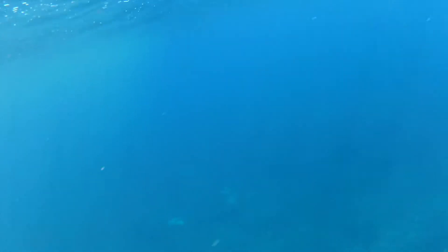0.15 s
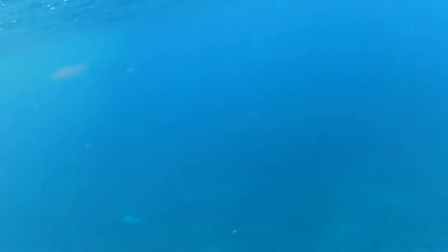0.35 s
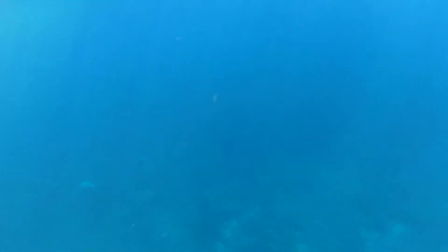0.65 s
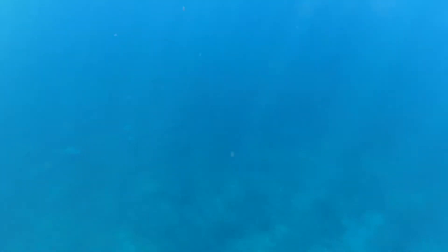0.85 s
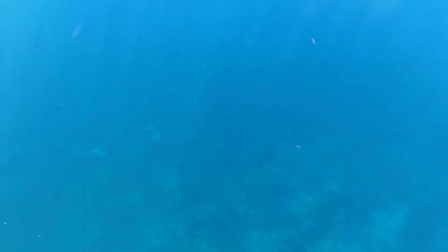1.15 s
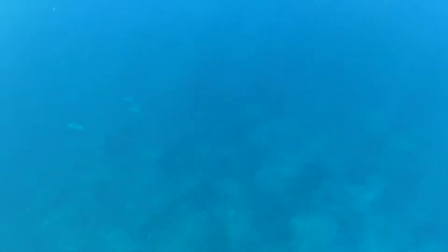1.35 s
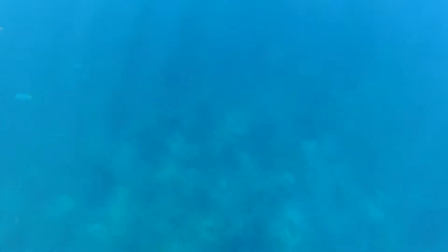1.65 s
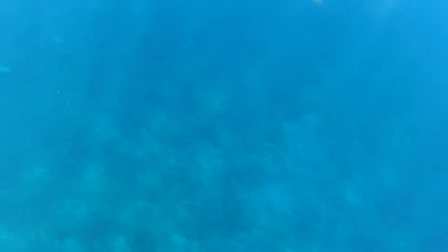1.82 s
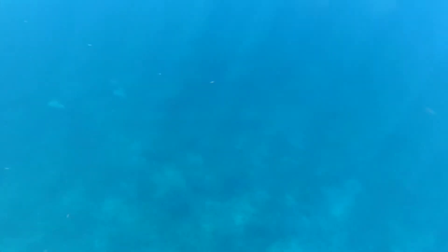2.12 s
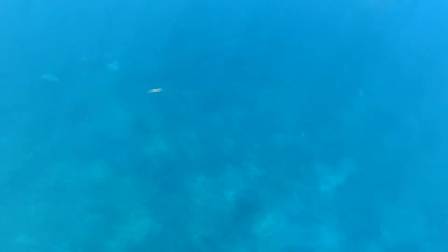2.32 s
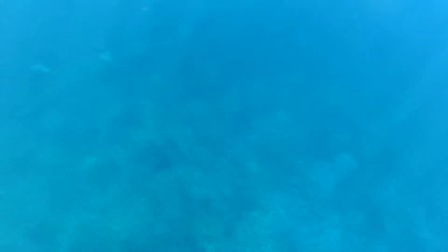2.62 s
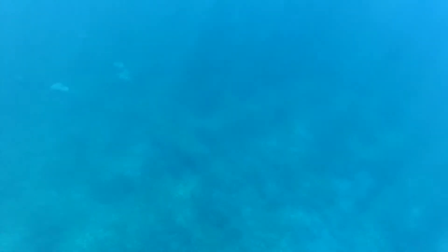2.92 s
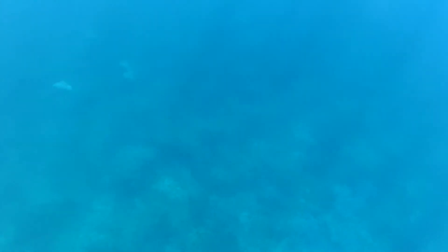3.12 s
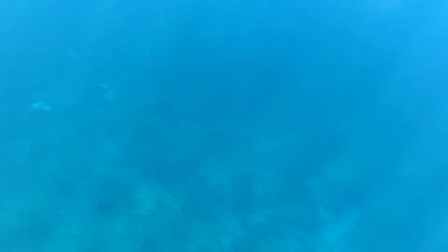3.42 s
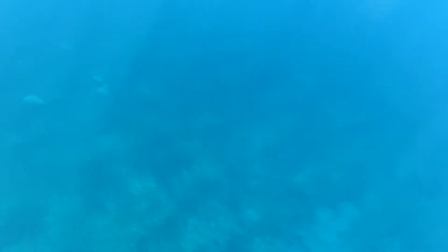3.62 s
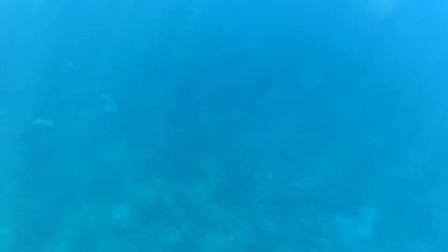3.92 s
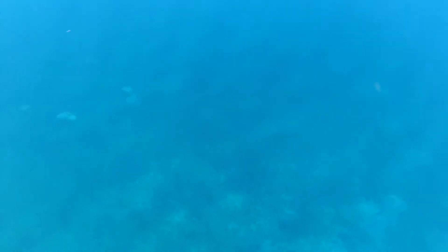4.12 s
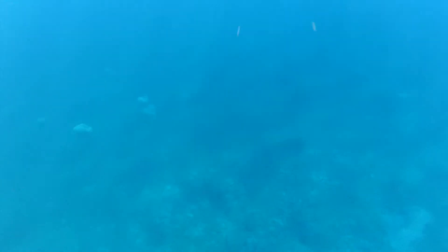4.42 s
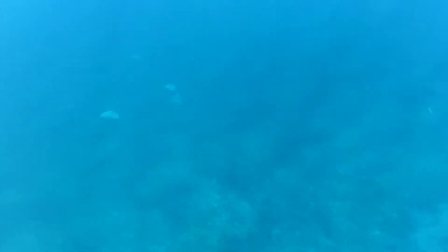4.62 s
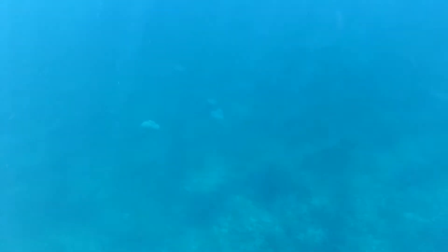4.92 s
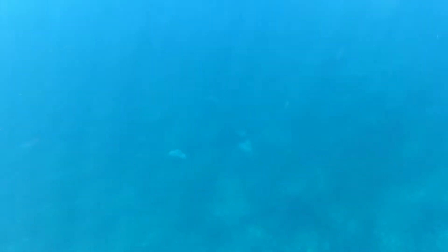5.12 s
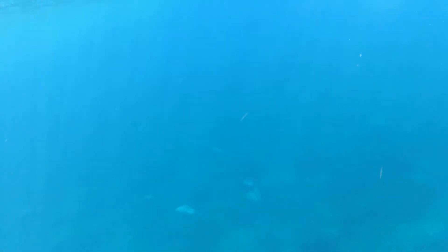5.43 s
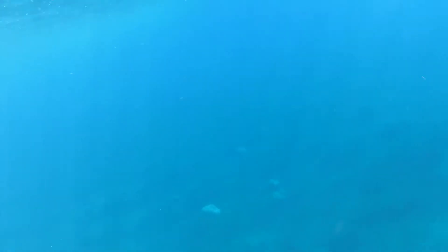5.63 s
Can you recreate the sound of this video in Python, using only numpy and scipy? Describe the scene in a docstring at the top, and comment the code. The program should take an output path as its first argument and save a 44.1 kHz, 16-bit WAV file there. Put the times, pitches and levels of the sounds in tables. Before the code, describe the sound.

Underwater, faint lapping and tiny snaps, then hard knocks on a camera housing before a boat engine catches and settles into a bubbling, hissing idle.

```python
"""Under water beside a boat, inside a camera housing. Small resonant bubbles lap at the surface, snaps sound,
and rubs and hard knocks excite the damped modes of the housing. Then the engine starts and settles to an idle.
Each early firing puffs exhaust into a gas pocket whose ring sinks as it grows; a harmonic throb follows.
Clouds of bubbles, made of filtered random clicks, gurgle in step; finer clicks through the housing's resonances
make the churned water hiss, and single large bubbles ring with rising pitch."""
import sys
import numpy as np
from scipy import signal
from scipy.fft import rfft, irfft
from scipy.io import wavfile

SR = 44100
rng = np.random.default_rng(int(sys.argv[2]) if len(sys.argv) > 2 else 0)


def to_wav(s):
    """Save 16-bit WAV."""
    ch = np.atleast_2d(s).T  # columns
    pcm = np.round(np.clip(ch, -1, 1) * 32767)  # PCM
    wavfile.write(sys.argv[1], SR, pcm.astype(np.int16))


N = 254016
TIME = np.arange(N) / SR
BUBBLE_TIME = np.arange(-SR // 30, SR // 20) / SR

# All spectra below are relative: [f/Hz, level/dB]
# Wash of still water; bubbles of the lapping: [f/Hz, level/dB]
STILL_WATER_SPECTRUM = [(25, -4), (55, -11), (85, -6.5), (140, -14.5), (210, -7), (420, -7), (700, -16),
                        (1100, -10.5), (1650, -19), (2100, -14.5), (2500, -19.5), (3000, -32), (9000, -52),
                        (15000, -35)]
LAP_SPECTRUM = [(120, -8), (270, -6.5), (450, 0), (560, -11.5), (660, -6), (850, -21.5), (1400, -8.5),
                (2500, -29)]
# Snaps in the water: [t/s, level/dB before the band-pass]
SNAPS = [(.078, -27.5), (.229, -34), (.283, -42), (.881, -28.5), (.991, -39)]
# Rubbing on the housing: [start t/s, length/s, rustle level/dB, scratch level/dB]
RUBS = [(0.949, 0.045, -43, -72), (1.081, 0.042, -40.5, -72), (1.138, 0.021, -33, -73),
        (1.163, 0.07, -27, -45.5), (1.245, 0.036, -42, -64), (1.357, 0.022, -27, -53),
        (1.386, 0.024, -40.5, -42.5), (1.435, 0.047, -33.5, -53)]
# Dull and scratchy parts of the rubbing: [f/Hz, level/dB]
RUSTLE_SPECTRUM = [(90, -18), (200, -3), (450, 1.5), (800, -1), (1050, 2), (1370, 6), (1700, -12),
                   (2500, -15), (3500, -44)]
SCRATCH_SPECTRUM = [(2500, -4), (3800, -5), (5200, 1), (7200, -7), (8500, 6), (10000, -12), (15000, -17)]
# Knocks on the housing: [t/s, level/dB added to the modes, ring f/Hz, contact cut-off f/Hz]
KNOCKS = [(1.1146, -21, 1260, 1700), (1.1378, -22.5, 1370, 2190), (1.163, 19, 1355, 7500),
          (1.1693, -4, 1480, 2320), (1.2149, -18.5, 1390, 2100), (1.231, -20, 1370, 2000),
          (1.3546, -1.5, 1045, 4100), (1.356, 3, 1350, 2900), (1.4203, 2, 1323, 3580),
          (1.4548, -24, 1250, 2200), (1.6485, -6, 1316, 2440)]
# Modes of the housing: [multiple of the ring f, mean level/dB, t60/s]
HOUSING_MODES = [(.33, -16.5, 0.0203), (.6, -9, 0.016), (.8, -8.5, 0.018), (0.998, 4, 0.015),
                 (1.24, -20, 0.026), (1.55, -12.5, 0.0071), (1.8, -10, .009), (3.8, -3, 0.0041)]
# Treble resonances of the housing: [f/Hz, half the bandwidth of each of two filters/Hz, level/dB]
LOWER_MODES = [(2500, 140, -1), (3015, 143, 0), (3324, 190, -2.5), (4584, 430, -3.5), (5138, 290, 6),
               (5160, 410, -11), (6054, 270, 1.5), (6616, 200, -1)]
UPPER_MODES = [(7720, 300, 4), (8400, 360, 3), (9160, 310, 2.5), (9850, 270, -2.5), (10260, 320, -2),
               (11000, 390, -9.5), (12230, 1400, -15), (13400, 700, -24), (14700, 700, -20)]
# Single large bubbles: [t/s at the loudest, level/dB, f/Hz at the loudest, swell/s]
LARGE_BUBBLES = [(.683, -31.5, 515, .006), (1.087, -21, 442, 0.0029), (1.195, -22.5, 560, 0.01),
                 (1.582, -10.5, 427, 0.0018), (1.946, -20, 613, .0017), (2.49, -10.5, 504.5, 0.0063),
                 (2.546, -6.5, 421, 0.008), (2.671, -5.5, 450, .003), (2.745, -9, 273, 0.011),
                 (2.755, -9, 599, 0.0066), (2.817, -6.5, 432, .004), (2.881, -9.5, 440, .012),
                 (3.315, -15.5, 606, 0.0035), (3.51, -14, 794, .0012), (3.558, -17, 679, 0.0041),
                 (3.657, -16.5, 657, 0.0047), (3.751, -14.5, 653, .006), (3.85, -15.5, 674, .004),
                 (4.301, -14, 710, 0.0029), (4.446, -18.5, 628, 0.006), (4.953, -7, 642, 0.0036),
                 (5.001, -10, 670, .0034), (5.051, -9.5, 648, .0044), (5.145, -16.5, 665, 0.0024),
                 (5.205, -20, 1050, 0.0021), (5.504, -18.5, 624, 0.0041)]
# Engine speed: [t/s, firing rate/Hz]
ENGINE_SPEED = [(1.72, 23.74), (1.9, 27.25), (2.05, 33.94), (2.2, 37.8), (2.4, 40.24), (2.7, 40.39),
                (3.1, 41.3), (3.5, 41.58), (3.8, 41.93), (4.3, 41.71), (4.8, 41.25), (5.1, 41.78),
                (5.76, 41.48)]
# Large, medium and small bubbles of the exhaust, and its low rumble: [f/Hz, level/dB]
LARGE_SPECTRUM = [(170, -8.5), (270, -5.5), (350, -3.5), (410, 0.5), (460, 2.5), (510, -6.5), (570, -14.5)]
MEDIUM_SPECTRUM = [(500, -18.5), (600, 3), (675, 1.5), (740, -4), (850, -2.5), (1000, -17.5), (1300, -17)]
SMALL_SPECTRUM = [(600, 3), (880, 0.5), (1080, 1.5), (1220, 2.5), (1380, 1.5), (1620, -6.5), (1850, -0.5),
                  (2000, -5), (2170, -2.5), (2320, -8.5), (2520, -0.5), (2800, -20), (3300, -9.5),
                  (3800, -50)]
RUMBLE_SPECTRUM = [(25, -30), (50, -9), (75, -2), (105, 2), (150, -6), (230, -13), (320, -18)]
# Burps of gas at the top of the surge: [middle t/s, length/s, level/dB]
BURPS = [(2.55, 0.056, -10), (2.679, 0.045, -13), (2.786, 0.21, -17)]
# Idle throb: [t/s, level/dB before trim and drift]
THROB_LEVEL = [(2.45, -20), (2.72, -17.5), (3.67, -19.5), (3.77, -21), (4.06, -16), (5.11, -18.5),
               (5.14, -20), (5.69, -18.5), (5.72, -21.5)]
# Harmonics of one pressure pulse: [multiple of the firing rate, relative level/dB]
THROB_ORDERS = [(2, 0.5), (3, -13.5), (4, -10), (5, -11.5), (6, -14), (7, -17), (8, -36), (9, -26.5),
                (10, -26), (11, -22.5), (12, -22)]
# Modes of the gas pocket:
# [multiple of its f, mean level/dB, t60/s, full strength t/s, rise/(dB/s), hold/s, fall/(dB/s)]
POCKET_MODES = [(0.653, -20.5, 0.13, 1.83, 200, .65, 80), (0.998, -12.5, 0.17, 2.01, 74, .42, 90),
                (1.194, -17, 0.14, 1.92, 280, .09, 67), (1.7, -23, .08, 2, 70, .15, 23)]

# Exhaust flow: it builds up to a surge, holds, settles to the idle and then fades slowly
SURGE_S, SURGE_RISE_DB_PER_S, SURGE_HOLD_S = 2.614, 23, 0.62
SETTLE_S, IDLE_DROP_DB, IDLE_FADE_DB_PER_S = 0.48, 6.5, .8
# A small bubble chirps sharply upwards as the pocket breaks
CHIRP_S, CHIRP_DB, CHIRP_HZ = 2.5185, -9, 1190
CHIRP_SWELL_S, CHIRP_DECAY_S, CHIRP_OCT_PER_S = 0.0024, 0.0047, 85
# The lower hiss swells once, briefly; later a narrow band sings out
HISS_SWELL_S, HISS_SWELL_LENGTH_S, HISS_SWELL_DB = 3.48, 0.13, 4.5
SING_S, SING_LENGTH_S, SING_DB = 4.7, 1, -44.5
SING_HZ, SING_FILTER_WIDTH_HZ = 7660, 560
# The ring has this pitch when the engine catches, and sinks as the pocket grows
CATCH_AT_S, RING_HZ, RING_SAG_HZ_PER_S = 1.9, 279.3, 234
CUTOFF_HZ = 15500


def from_db(db):
    """Level to amplitude: 20 dB is a factor of ten."""
    return 10 ** (np.asarray(db) / 20)


def rms_one(x):
    """Normalisation to unit root-mean-square amplitude."""
    return x / np.sqrt(np.mean(x ** 2) + 1e-20)


def in_time(rows):
    """Linear interpolation of a table's columns at every sample."""
    s, *columns = np.transpose(rows)
    return [np.interp(TIME, s, column) for column in columns]


def coloured(x, spectrum):
    """Spectral shaping: weights frequencies on a logarithmic axis, then sets rms 1."""
    hz, db = np.transpose(spectrum)
    bins = np.arange(1, N // 2 + 2) * SR / N
    gain_db = np.interp(np.log(bins), np.log(hz), db, left=-80, right=-80)
    return rms_one(irfft(rfft(x) * from_db(gain_db), N))


def drift(rate):
    """Slow random fluctuation: noise knots at this rate per second joined by lines; rms 1."""
    knots = rng.standard_normal(int(N / SR * rate) + 2)
    return rms_one(np.interp(TIME * rate, np.arange(len(knots)), knots))


def white_noise():
    """Noise with equal mean power at all frequencies."""
    return rng.standard_normal(N)


def resonance(x, hz, width_hz):
    """Damped resonance: a two-pole band-pass of about unit peak gain."""
    r = np.exp(-np.pi * width_hz / SR)
    feedback = [1, -2 * r * np.cos(2 * np.pi * hz / SR), r * r]
    return signal.lfilter(np.array([1, 0, -1]) * (1 - r * r) / 2, feedback, x)


def double_resonance(x, hz, width_hz):
    """Two equal resonances in series, giving steeper skirts."""
    return resonance(resonance(x, hz, width_hz), hz, width_hz)


def through_modes(x, modes):
    """Modal filtering: parallel resonances, fed at staggered delays; rms 1."""
    total = np.zeros(N)
    for k, (hz, width, db) in enumerate(modes):
        delayed = np.roll(x, k * SR // 7)
        total += from_db(db) * double_resonance(delayed, hz, 2 * width)
    return rms_one(total)


def grains(per_s, spread_db):
    """Shot noise: random clicks of uneven size and either sign; rms 1."""
    sizes = from_db(spread_db * np.minimum(rng.exponential(1, N), 4))
    signed = sizes * rng.choice([-1, 1], N)
    return rms_one(signed * (rng.random(N) < per_s / SR))


def add(out, sound, s):
    """Superposition: adds a sound in place, starting at time s."""
    i = max(int(s * SR), 0)
    out[i:i + len(sound)] += sound[:max(N - i, 0)]


def envelope(full_s, rise_db_per_s, hold_s, fall_db_per_s):
    """Exponential growth, hold and decay, in dB below the top."""
    rise = rise_db_per_s * np.maximum(full_s - TIME, 0)
    fall = fall_db_per_s * np.maximum(TIME - full_s - hold_s, 0)
    return -rise - fall


def bump(s, length):
    """Gaussian swell of height 1 about time s; its length lies between the 1/e points."""
    return np.exp(-(2 * (TIME - s) / length) ** 2)


def calm_water(floor_db=-51, lower_db=-58, upper_db=-63):
    """Broadband background: a soft wash, and a faint hiss filtered by the housing's modes."""
    wash = from_db(floor_db) * coloured(white_noise(), STILL_WATER_SPECTRUM)
    white = white_noise()
    lower = from_db(lower_db) * through_modes(white, LOWER_MODES)
    upper = from_db(upper_db) * through_modes(white, UPPER_MODES)
    return wash + lower + upper


def lapping(level_db=-44, waver_db=0.5, per_s=200, spread_db=1.5, cycles=7, count=14):
    """Bubble resonance: ripples fold in small bubbles that ring for a few cycles; the lapping builds and ebbs."""
    drops = sum(resonance(grains(per_s / count, spread_db), hz, hz / cycles)
                for hz in np.geomspace(280, 1100, count))
    swell_db = envelope(full_s=.62, rise_db_per_s=15, hold_s=0.5, fall_db_per_s=7)
    swell_db = swell_db + waver_db * drift(11.8)
    return from_db(level_db + swell_db) * coloured(drops, LAP_SPECTRUM)


def ticks():
    """Impulsive sources: exponentially decaying noise snaps, band-passed to sound bright."""
    out, t = np.zeros(N), np.arange(SR // 100) / SR
    for s, db in SNAPS:
        add(out, from_db(db) * np.exp(-t / 0.0015) * rng.standard_normal(len(t)), s)
    return double_resonance(out, 6400, 3500)


def rubs():
    """Stick-slip friction on the housing: dense clicks form a dull rustle and a scratchy top."""
    rustle = coloured(grains(1200, 3.8), RUSTLE_SPECTRUM)
    scratch = coloured(grains(8000, 2.5), SCRATCH_SPECTRUM)
    out = np.zeros(N)
    for s, length, db, scratch_db in RUBS:
        stroke = np.exp(-(2 * (TIME - s) / length - 1) ** 4)
        out += stroke * (from_db(db) * rustle + from_db(scratch_db) * scratch)
    return out


def knocks():
    """Modal impact: blows ring the water-damped housing, and a soft contact low-passes the attack."""
    out, t = np.zeros(N), np.arange(SR // 10) / SR
    for s, db, hz, contact_hz in KNOCKS:
        ring = np.zeros(len(t))
        for ratio, mode_db, t60 in HOUSING_MODES:
            decay = from_db(mode_db + rng.standard_normal() - 60 * t / t60)
            ring += decay * np.sin(2 * np.pi * hz * ratio * t)
        contact = signal.butter(6, min(contact_hz, SR / 3), fs=SR, output="sos")
        add(out, from_db(db) * signal.sosfilt(contact, ring), s)
    return out


def crank():
    """Phase is integrated speed: firings counted from the first, which fall on whole numbers."""
    turns = np.cumsum(in_time(ENGINE_SPEED)[0]) / SR
    return turns - np.interp(1.759, TIME, turns)  # first firing, s


def firings(turns):
    """Phase crossings: sample numbers at which the count passes a whole number."""
    return np.flatnonzero((np.diff(np.floor(turns)) > 0) & (turns[1:] >= 0))


def exhaust_flow():
    """Source strength: flow of gas in dB below the top of the surge."""
    settled = np.clip((TIME - SURGE_S - SURGE_HOLD_S) / SETTLE_S, 0, 1)
    surge = envelope(SURGE_S, SURGE_RISE_DB_PER_S, SURGE_HOLD_S, IDLE_FADE_DB_PER_S)
    return surge - IDLE_DROP_DB * settled


def bubble(db, hz, swell_s, decay_s, rise_oct_per_s):
    """Volume resonance: a bubble pinches off and rings with rising pitch, loudest near time zero."""
    t = BUBBLE_TIME
    shape = np.where(t < 0, np.exp(-(t / swell_s) ** 2), np.exp(-np.abs(t) / decay_s))
    pitch = hz * 2 ** np.clip(rise_oct_per_s * t, -1, 1)
    cycles = np.cumsum(pitch) / SR + rng.random()
    return from_db(db) * shape * np.sin(2 * np.pi * cycles)


def gulps(turns, flow_db, tail=0.96, rise_oct_per_s=0.78, chance=.35, stray_db=-21, stray_follows=0.57,
          stray_hz=650, spread_db=1.5, spread_oct=.35, stray_swell_s=.0035):
    """Single-bubble resonance: large bubbles, a chirp, and stray bubbles shed by chance firings
    once the surge has reached its top."""
    out, shed = np.zeros(N), firings(turns)
    lucks, variations = rng.random(len(shed)), rng.standard_normal((len(shed), 2))
    strays = []
    for i, luck, (loud, high) in zip(shed, lucks, variations):
        if luck < chance and TIME[i] > SURGE_S:
            db = stray_db + stray_follows * flow_db[i] + spread_db * loud
            strays.append((TIME[i], db, stray_hz * 2 ** (spread_oct * high), stray_swell_s))
    for s, db, hz, swell_s in list(LARGE_BUBBLES) + strays:
        add(out, bubble(db, hz, swell_s, tail * swell_s, rise_oct_per_s), s + BUBBLE_TIME[0])
    chirp = bubble(CHIRP_DB, CHIRP_HZ, CHIRP_SWELL_S, CHIRP_DECAY_S, CHIRP_OCT_PER_S)
    add(out, chirp, CHIRP_S + BUBBLE_TIME[0])
    return out


def churn(turns, lower_db=-37.5, upper_db=-43, onset_speed=36.1, onset_width=1.0, slow_drop_db=10,
          slow_beat_db=1.5, beat_db=1.7, flutter_db=0.8, surge_db=0.7):
    """Dense shot noise: the finest bubbles crackle into a hiss that pulses with the engine.
    Below the onset speed (firings/s) it comes in dull spurts; above, it smooths out and its top opens up."""
    too_slow = (1 - np.tanh((in_time(ENGINE_SPEED)[0] - onset_speed) / onset_width)) / 2
    lower = lower_db + envelope(full_s=2.26, rise_db_per_s=27.5, hold_s=0.88, fall_db_per_s=2.0)
    lower = lower + HISS_SWELL_DB * bump(HISS_SWELL_S, HISS_SWELL_LENGTH_S)
    upper = upper_db + envelope(full_s=1.8, rise_db_per_s=60, hold_s=2.1, fall_db_per_s=2.0)
    upper = upper - slow_drop_db * too_slow + surge_db * drift(35)
    hiss = from_db(lower) * through_modes(grains(14000, 4.4), LOWER_MODES)
    hiss += from_db(upper) * through_modes(grains(9000, 7.3), UPPER_MODES)
    singing = rms_one(double_resonance(white_noise(), SING_HZ, SING_FILTER_WIDTH_HZ))
    hiss += from_db(SING_DB) * bump(SING_S, SING_LENGTH_S) * singing
    pulse_db = (beat_db + slow_beat_db * too_slow) * np.cos(2 * np.pi * turns)
    return hiss * from_db(pulse_db + flutter_db * drift(70))


def exhaust_cloud(turns, flow_db, large_db=-23.5, medium_db=-26, small_db=-28.0, rumble_db=-25,
                  large_follows=0.68, medium_follows=0.9, small_follows=1.03, rumble_follows=0.96,
                  beat_db=-0.5, medium_beat_db=1.0, small_beat_db=0.5, uneven_db=2.0, lead=0.038):
    """Modulated shot noise: bubbles of three size ranges follow the flow over a low rumble.
    The beat leads the firing slightly, weakening large bubbles and lifting the rest; firings shed unevenly."""
    beat = np.cos(2 * np.pi * (turns + lead))
    firing = np.round(turns - np.floor(turns[0])).astype(int)
    luck = np.clip(rng.standard_normal(firing[-1] + 1), -2, 2)
    shed = uneven_db * luck[firing] * (1 + beat) / 2
    burps = sum(from_db(db) * bump(s, length) for s, length, db in BURPS)

    large = coloured(grains(1500, 2.3) * from_db(beat_db * beat + shed), LARGE_SPECTRUM)
    medium = coloured(grains(1500, 3.3) * from_db(medium_beat_db * beat + shed), MEDIUM_SPECTRUM)
    small = coloured(grains(4000, 2.35) * from_db(small_beat_db * beat + shed / 2), SMALL_SPECTRUM)
    rumble = coloured(white_noise(), RUMBLE_SPECTRUM)
    cloud = large * np.hypot(from_db(large_db + large_follows * flow_db), burps)
    cloud += medium * from_db(medium_db + medium_follows * flow_db)
    cloud += small * from_db(small_db + small_follows * flow_db)
    cloud += rumble * from_db(rumble_db + rumble_follows * flow_db)
    return np.interp(TIME, [1.66, 1.78], [0, 1]) * cloud


def throb(turns, level_db=-.5, first_db=-25.0, uneven_db=.5, upper_uneven_db=1.1):
    """Fourier synthesis of the idle's pressure pulses; the first order swells and fades on its own."""
    angle = 2 * np.pi * (turns + .003 * drift(40))
    sharpness = from_db(upper_uneven_db * drift(40))
    wave = np.zeros(N)
    for order, db in THROB_ORDERS:
        harmonic = from_db(db) * np.cos(round(order) * angle)
        wave += harmonic * (sharpness if order > 2.5 else 1)
    first_level = first_db + envelope(full_s=3.0, rise_db_per_s=7, hold_s=.35, fall_db_per_s=3.6)
    first = np.cos(angle) * from_db(first_level)
    wave = wave * from_db(in_time(THROB_LEVEL)[0] + level_db + uneven_db * drift(40)) + first
    # sqrt(2) makes each cosine's level an rms level
    return np.sqrt(2) * wave * np.interp(TIME, [2.1, 2.55], [0, 1])


def start_up(turns, hull_hz=445, hull_db=-21, hull_t60=0.16, puff_hz=165, puff_s=0.0034, swell_s=0.0012,
             uneven_db=2.0, puff_uneven_db=1.5, jitter=0.023):
    """Impulse-excited cavity: each puff rings the gas pocket unevenly, and the hull faintly, then all fall away."""
    puff_db = -9.5 + envelope(full_s=1.895, rise_db_per_s=260, hold_s=0.46, fall_db_per_s=131)
    modes = [(ratio, db + envelope(*shape), t60) for ratio, db, t60, *shape in POCKET_MODES]
    out, t = np.zeros(N), np.arange(-SR // 100, SR // 8) / SR
    after = np.maximum(t, 0)
    swell = np.exp(-(np.minimum(t, 0) / swell_s) ** 2)
    puff = np.cos(2 * np.pi * puff_hz * t) * np.exp(-(t / puff_s) ** 2)
    for i in firings(turns)[:40]:
        pocket_hz = RING_HZ - RING_SAG_HZ_PER_S * (TIME[i] - CATCH_AT_S)
        luck = np.clip(rng.standard_normal((len(modes), 2)), -2, 2)
        ring = np.zeros(len(t))
        for (ratio, db, t60), (detune, loud) in zip(modes, luck):
            mode_hz = ratio * pocket_hz * (1 + jitter * detune)
            decay = from_db(db[i] + uneven_db * loud - 60 * after / t60)
            ring += np.cos(2 * np.pi * mode_hz * t) * decay
        hull_ring = np.cos(2 * np.pi * (hull_hz * t + rng.random()))
        hull = swell * hull_ring * from_db(hull_db - 60 * after / hull_t60)
        strength = from_db(puff_db[i] + puff_uneven_db * rng.standard_normal())
        add(out, swell * ring + strength * (puff + hull), TIME[i] + t[0])
    return signal.sosfilt(signal.butter(1, 22, "high", fs=SR, output="sos"), out)


def scene():
    """Linear superposition of all sources at one microphone."""
    turns, flow_db = crank(), exhaust_flow()
    water = calm_water() + lapping() + ticks()
    handling = rubs() + knocks()
    bubbles = gulps(turns, flow_db) + churn(turns) + exhaust_cloud(turns, flow_db)
    engine = throb(turns) + start_up(turns)
    return (water + handling + bubbles + engine)[None]


def record(dry):
    """Overload and band limit: peaks are clipped, then a steep low-pass cuts the top."""
    clipped = np.clip(dry, -.97, .97)
    return signal.sosfilt(signal.ellip(10, .1, 80, CUTOFF_HZ, fs=SR, output="sos"), clipped)


dry = scene()
out = record(dry)
to_wav(out)
```